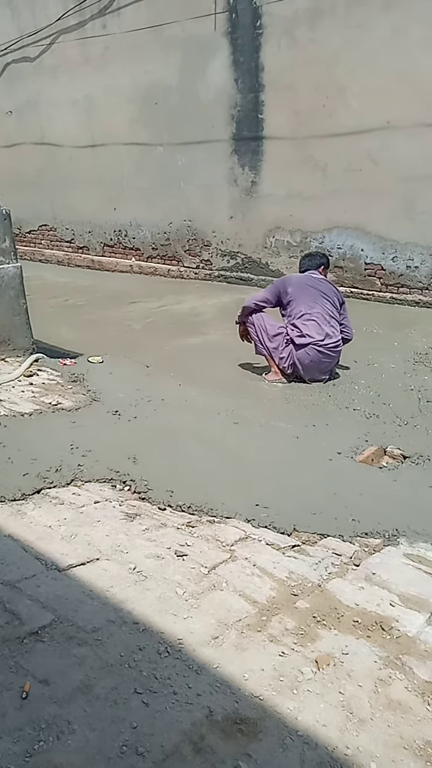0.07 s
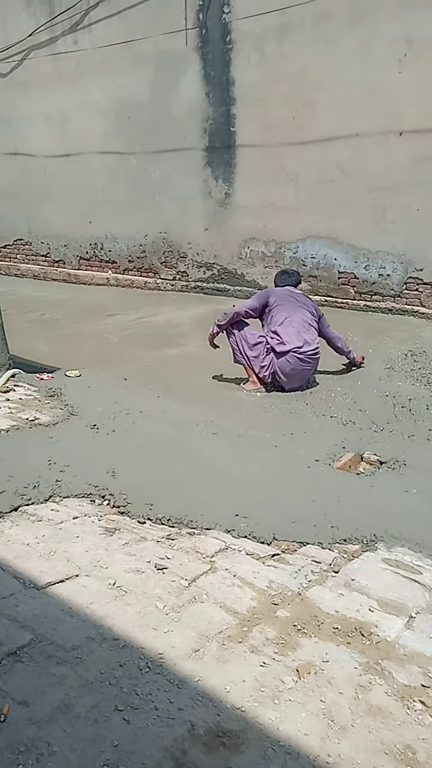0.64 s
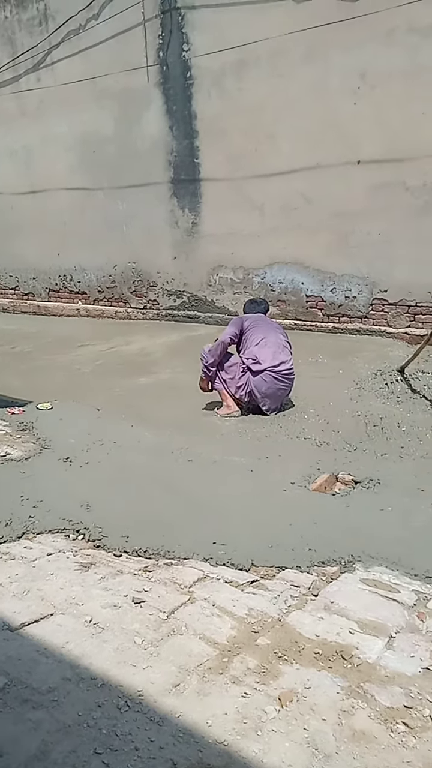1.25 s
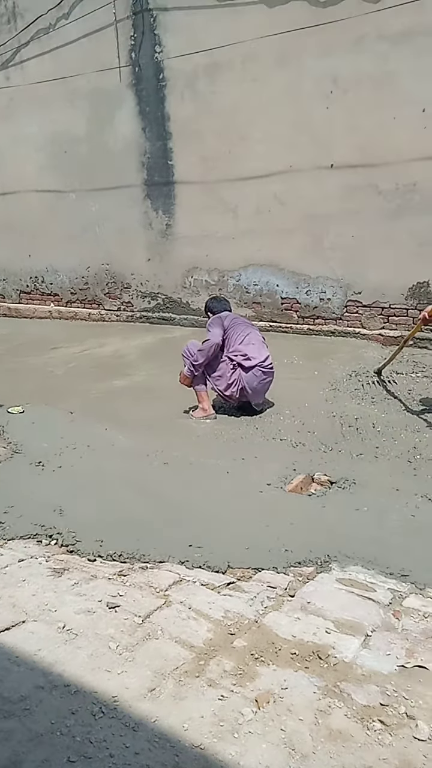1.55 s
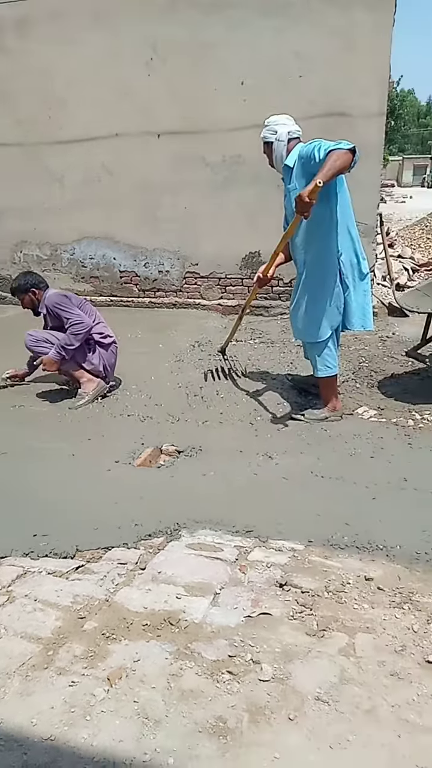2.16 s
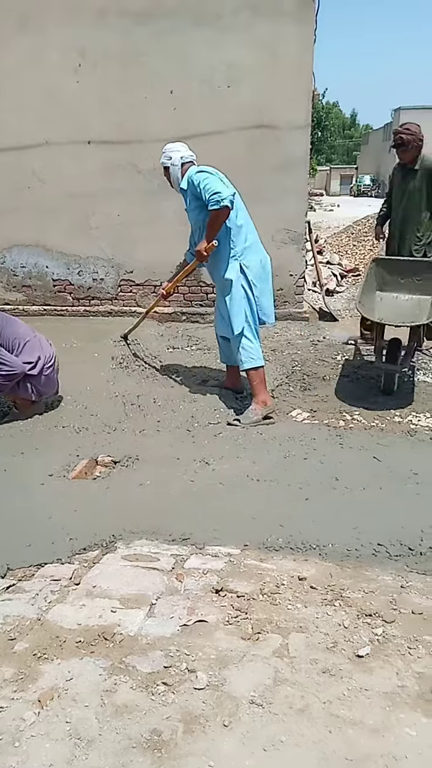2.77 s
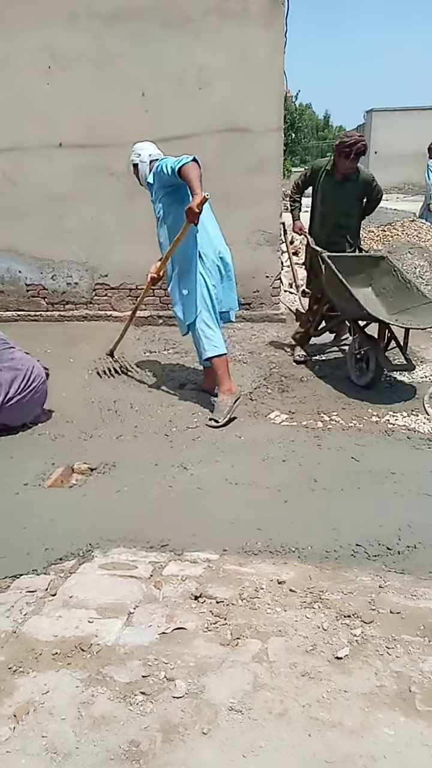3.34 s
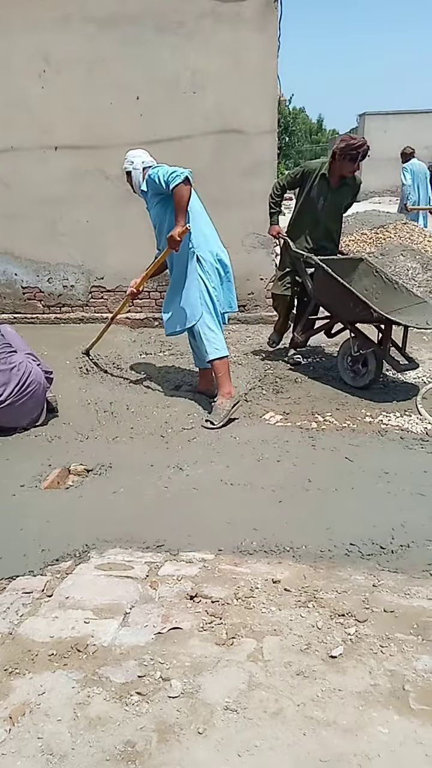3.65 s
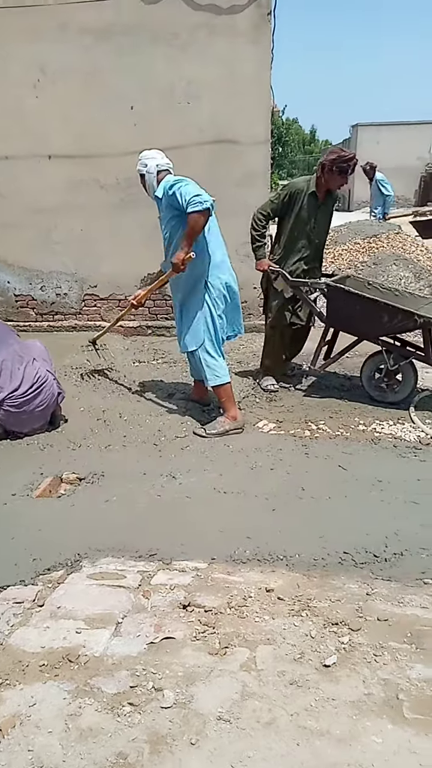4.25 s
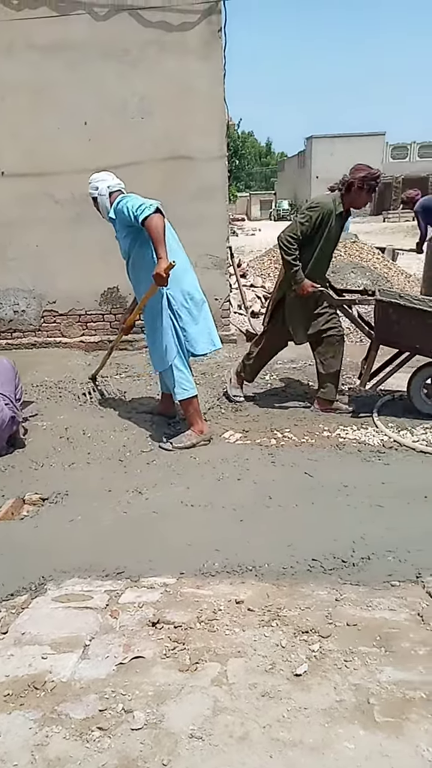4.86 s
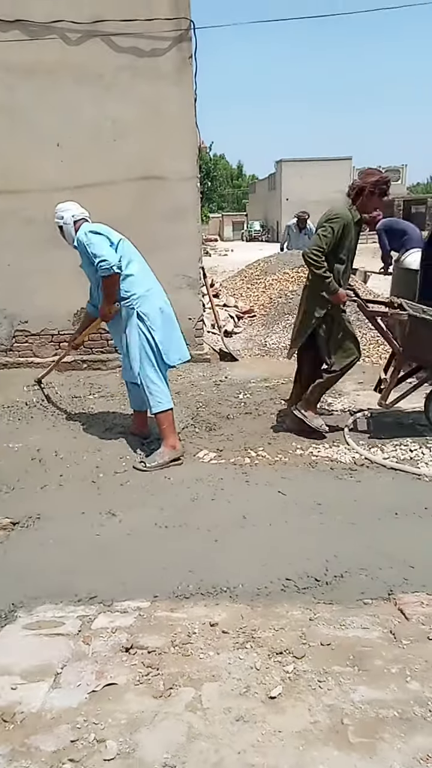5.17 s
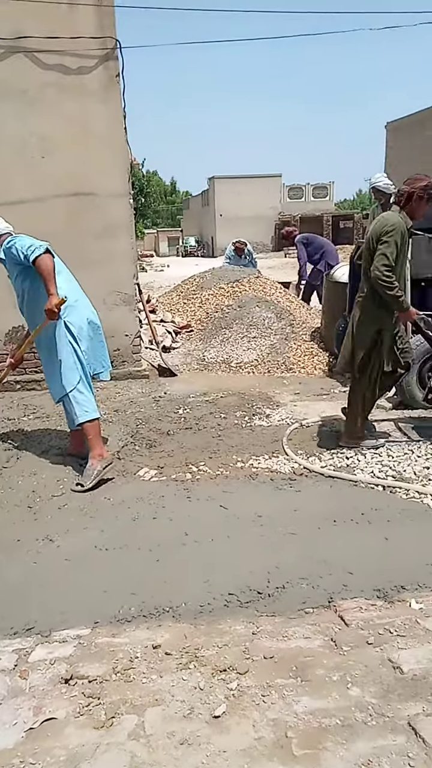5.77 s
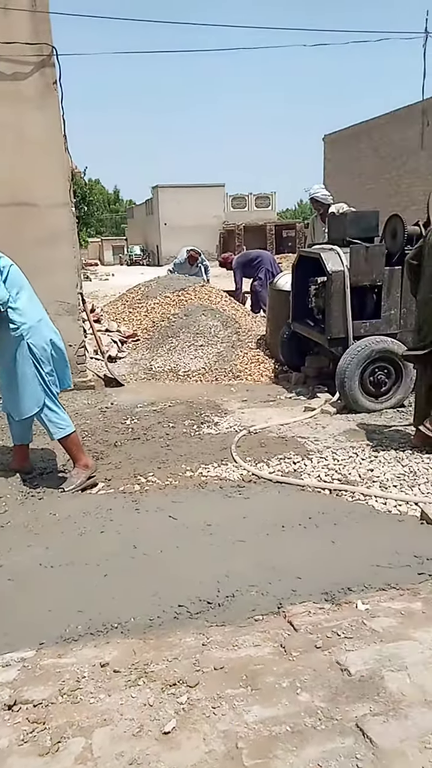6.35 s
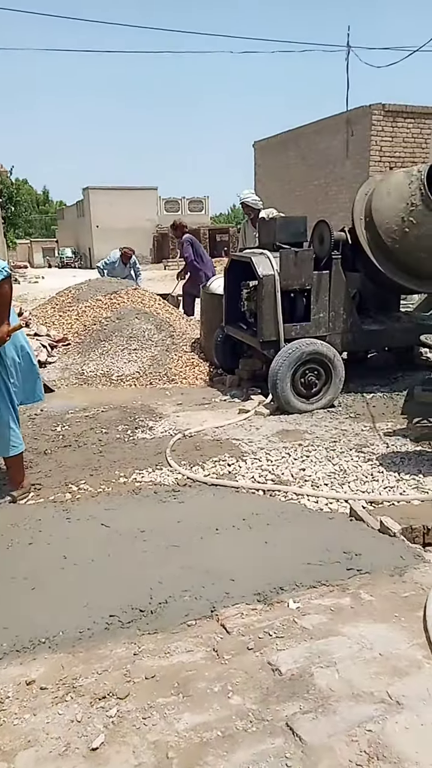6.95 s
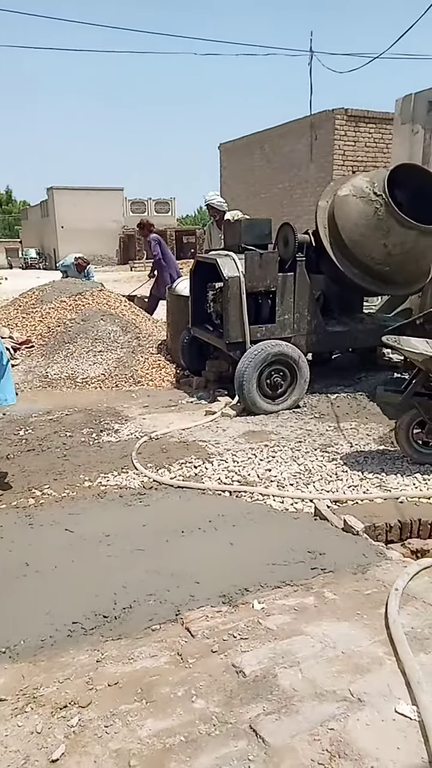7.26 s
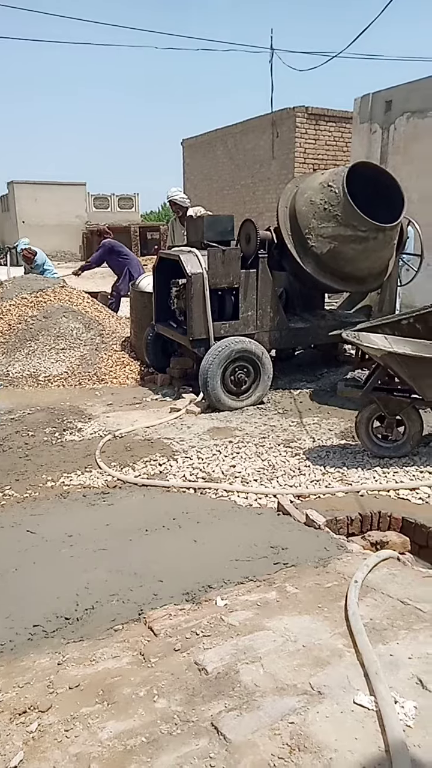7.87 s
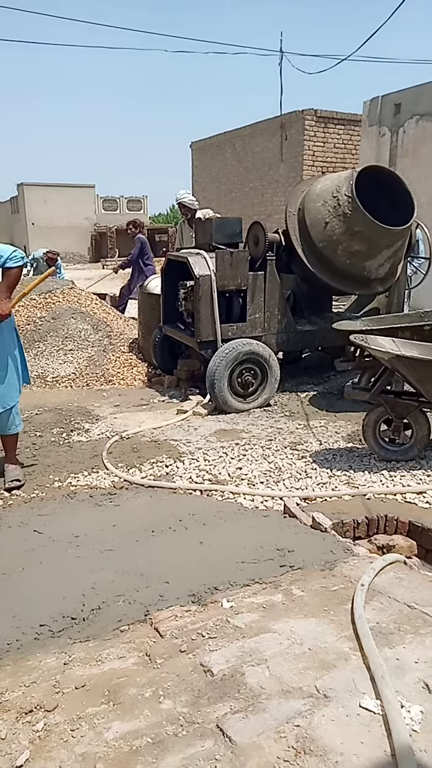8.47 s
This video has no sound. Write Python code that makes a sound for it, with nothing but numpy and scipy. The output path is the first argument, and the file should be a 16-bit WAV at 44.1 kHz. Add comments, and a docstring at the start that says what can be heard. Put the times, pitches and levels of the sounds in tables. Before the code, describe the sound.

A one-cylinder diesel engine drives a concrete mixer in an open yard, chugging steadily at about nine beats a second. Each beat has a low exhaust thump, a metallic knock and valve clatter, while gears grind and faintly whine underneath. Some firings knock harder, and a wall throws the knocks back. The sound dulls slightly early on and grows brighter toward the end, as the mixer faces the microphone more openly.

```python
"""A steady chugging, about 9.4 beats a second: a one-cylinder diesel turns a concrete mixer in a yard.
Its speed and effort wander with the load of the drum, and now and then a firing knocks out hard.
Each cycle brings a gulp of air, a shudder of the engine block, a knock of burning fuel, an exhaust
thump and valve clatter. Gears grind and sing underneath, a wall throws the knocks back,
and a low hum sounds once, briefly."""
import sys
import numpy as np
from scipy import signal
from scipy.fft import rfft, irfft, next_fast_len
from scipy.io import wavfile

SR = 44100
rng = np.random.default_rng(int(sys.argv[2]) if len(sys.argv) > 2 else 0)


def log_audio(samples):
    """Write samples as a 16-bit WAV file to the path given in sys.argv[1]."""
    # one column per channel
    frames = np.atleast_2d(samples).T
    # limit to full scale, then quantise
    limited = np.clip(frames, -1, 1)
    pcm = np.round(limited * 32767).astype(np.int16)
    wavfile.write(sys.argv[1], SR, pcm)


N = 375291
TIME = np.arange(N) / SR
RING_TIME = np.arange(SR // 3) / SR  # seconds since a blow

# How openly the mixer's bright-sounding side faces us. Each row: time in seconds, openness in dB.
OPENNESS = [(0, -4), (1.6, -12), (2.6, -3.5), (4.8, -3), (6.05, -1.5), (6.4, 0.5), (7.5, 3.5), (8.5, 0)]


def chug(gulp_db, thump_db):
    """Air intake, engine block and exhaust ring in turn; swirling gas roughens the thump."""
    # The tones each part rings with. Each row: pitch in Hz, relative level in dB, fade time in seconds.
    intake_tones = [(95.7, -31, 0.26), (287, -32.5, 0.27), (396.4, -9, 0.16)]
    block_tones = [(75.5, -36, 0.27), (125, -29, 0.042), (261.6, -11, 0.13), (351, -10.5, .08)]
    exhaust_tones = [(139.8, -17.5, .22), (165.54, -11, 0.23), (184.8, -14, .2), (220.8, -26.5, 0.34),
                     (341, -9.5, .04), (418, -27, 0.054), (496.6, -17.5, .06), (547.7, -25.5, 0.12)]
    # The gas puff and a steady rumble. Each row: frequency in Hz, relative level in dB.
    puff_spectrum = [(40, -46), (100, -17.5), (130, -2.5), (195, 7.5), (250, -10.5), (320, -6.5),
                     (400, -4.5), (500, -11), (700, -18.5), (5000, -94)]
    rumble_spectrum = [(20, -17.5), (42, -27.5), (62, -10.5), (76, -1), (100, -3), (132, -2.5), (200, 2.5),
                       (320, -2), (420, -2), (500, -9), (700, -27.5), (1500, -44.5), (5000, -92)]
    intake = stroke(intake_tones, .0071, gulp_db, rise=.003, spread_db=1)
    block = stroke(block_tones, .018, .7 * thump_db, rise=.003, spread_db=1.5)
    exhaust = stroke(exhaust_tones, .0338, thump_db, rise=.003, spread_db=1.3)
    puffs = each_cycle(burst(rise=.0014, fade=.34), .02, .88 * thump_db)
    gas = amp(-19.5) * puffs * rattle(puff_spectrum, alike=.3)
    rumble = amp(-23.5) * rattle(rumble_spectrum, alike=.59)
    return intake + block + exhaust + gas + rumble


def knock(hard_db, ping_db):
    """Burning fuel cracks against the cylinder, now soft, now hard; a wall answers each crack."""
    # The knock's crack, and a crisp, bright tick heard with the hardest knocks.
    # Each row: frequency in Hz, relative level in dB.
    knock_spectrum = [(300, -13), (1000, 3.5), (1400, -4.5), (1900, 7), (2350, 9.5), (2600, 0), (2950, 4.5),
                      (3400, -3), (4200, -8), (4700, -24.5), (5500, -39.5), (6600, -34.5), (8300, -52.5),
                      (10800, -42), (13000, -59)]
    tick_spectrum = [(1500, -22), (3000, -9), (3800, -8), (4250, 0), (4550, -9), (4900, -28), (5500, -38),
                     (6600, -35), (8300, -54), (10800, -38), (13000, -60)]
    # Gas ringing in the cylinder. Each row: pitch in Hz, relative level in dB, fade time in seconds.
    ping_tones = [(4160, -50, .09), (4340, -48, .09)]
    crack = each_cycle(soft_burst(rise=.0006, fade=.055), .0286, hard_db)
    echo = each_cycle(soft_burst(rise=.00091, fade=.16), .0415, hard_db)
    tick_gain = each_cycle(soft_burst(rise=.0006, fade=.035), .028, ping_db)
    tick = amp(-44) * tick_gain * rattle(tick_spectrum, alike=.1)
    ping = stroke(ping_tones, .0285, ping_db, rise=.0006, spread_db=1)
    return amp(-24.5) * rattle(knock_spectrum, alike=.13) * np.hypot(crack, .45 * echo) + tick + ping


def firings():
    """Sets each cycle's strength: thump and knock follow the engine's effort, and partly chance."""
    # How hard the engine pulls against the drum. Each row: time in seconds, effort in dB.
    effort = [(0, -4), (.45, 3), (1.22, 1.5), (1.43, -2), (1.9, 1), (2.15, -2), (2.9, 1.5), (3.45, 1.5),
              (3.66, -0.5), (4.19, -2.5), (4.5, 0.7), (5.67, -0.5), (5.85, -5.5), (6.1, -4.5), (6.25, 4),
              (6.95, 0.5), (7.6, 2.5), (8.5, 0)]
    # The air gulp as people pass in front. Each row: time in seconds, relative level in dB.
    gulp_levels = [(0, 5.5), (2, 0), (2.7, 2.4), (4.8, 1.5), (5.5, 0), (6.15, 1.5), (6.85, -1.5), (7.6, 1),
                   (8.5, -0.1)]
    # Firings that knock out hard. Each row: time in seconds, hardness in dB, ping strength in dB.
    hard_knocks = [(.297, -1, 9), (1.146, 0.5, 6.5), (1.252, 2.5, 13.5), (1.987, 1.5, 9), (2.951, 8.5, 12),
                   (3.057, 11, 20.5), (3.481, 10, 10), (3.903, 5.5, -7), (4.008, 6.5, -5), (4.54, 10.5, -3),
                   (5.389, -4, 6), (5.706, 1.5, -2), (6.451, 4.5, 5), (6.666, 5.5, 14), (6.771, 5.5, 13),
                   (7.622, 5.5, 11), (7.728, 6, 13), (7.833, 10.5, 16.5), (8.459, 5.5, 15)]
    starts, effort_db = cycle_starts(), per_cycle(effort)
    air, fuel, timing = rng.standard_normal((len(starts), 3)).T
    gulp_db = per_cycle(gulp_levels) + 1.17 * air
    thump_db = effort_db + .42 * fuel
    hard_db = -1.5 + .8 * thump_db + .69 * per_cycle(OPENNESS) + 3.5 * timing
    ping_db = 1 + 1.5 * hard_db
    for when, hardness, ping in hard_knocks:
        cycle = np.argmin(abs(starts - when))
        hard_db[cycle], ping_db[cycle] = hardness, ping
        thump_db[cycle] = effort_db[cycle] + 1  # a hard firing also thumps more
    return gulp_db, thump_db, hard_db, ping_db


def cycle_starts():
    """Adds up the engine's speed to find when each cycle starts; the first is already under way."""
    # The speed wanders as its regulator hunts. Each row: time in seconds, firings per second.
    speed = [(0, 9.406), (1.2, 9.432), (1.25, 9.515), (2.05, 9.49), (2.7, 9.216), (3.05, 9.393),
             (3.55, 9.475), (5.3, 9.394), (5.85, 9.5), (6.25, 9.301), (6.8, 9.413), (7.4, 9.376),
             (8.1, 9.652), (8.5, 9.457)]
    first_full_s = .0535
    cycles = np.cumsum(np.interp(TIME, *np.transpose(speed))) / SR
    cycles -= np.interp(first_full_s, TIME, cycles)
    return np.r_[first_full_s - 1 / speed[0][1], np.interp(np.arange(cycles[-1]), cycles, TIME)]


def valves():
    """A tappet (a valve's pusher) ticks as the inlet shuts; the rocker levers clatter later on."""
    # The noises of the steel parts. Each row: frequency in Hz, relative level in dB.
    clatter_spectrum = [(300, -11), (900, 10.5), (1500, 5.5), (1850, 1.5), (2600, 6), (2950, 4),
                        (3250, -1.5), (4100, -7.5), (4700, -21.5), (5600, -48), (6600, -40), (8000, -65.5),
                        (11000, -50.5), (14000, -57)]
    sizzle_spectrum = [(800, -17), (1750, 5.5), (2400, -4), (3500, -9), (4300, -10.5), (5400, -32),
                       (6700, -32.5), (8000, -51.5), (11000, -51.5), (14000, -64.5)]
    tappet_spectrum = [(500, -27.5), (1700, -6.5), (2150, 0.5), (2380, 7), (2650, -6), (2900, -7),
                       (3300, -15.5), (4300, -26.5), (5500, -55.5), (9000, -73.5)]
    # Loudness as people pass in front. Each row: time in seconds, relative level in dB.
    clatter_levels = [(0, -28), (1.6, -29.5), (2.4, -26.5), (4.9, -26.5), (5.3, -32), (5.9, -32.5),
                      (6.3, -24), (7, -27), (8.5, -27.5)]
    tappet_levels = [(0, -4), (1.6, -8), (2.8, 1.5), (4.5, 2.5), (5.5, -5), (6.4, -6), (7.4, 1), (8.5, -1)]
    rockers = amp(2.5) * each_cycle(burst(rise=.001, fade=.13), .064, spread_db=1.2, jitter=.0007)
    rebound = amp(1) * each_cycle(burst(rise=.003, fade=.08), .079, spread_db=2, jitter=.003)
    shaking = amp(2.5) * each_cycle(burst(rise=.004, fade=.15), .034, spread_db=2, jitter=.003)
    motion = np.sqrt(amp(-5.5) ** 2 + rockers ** 2 + rebound ** 2 + shaking ** 2)
    ticks = each_cycle(burst(rise=.001, fade=.05), .001, spread_db=1.2, jitter=.0005)
    clatter = curve(clatter_levels) * rattle(clatter_spectrum, alike=.073)
    sizzle = amp(-36) * curve(OPENNESS) * rattle(sizzle_spectrum, alike=.17)
    tappet = amp(-26.5) * curve(tappet_levels) * ticks * rattle(tappet_spectrum, alike=.1)
    return motion * (clatter + sizzle) + tappet


def gears():
    """The drum's gears grind harder after each push of the engine, and one sings unsteadily."""
    # The grinding noise. Each row: frequency in Hz, relative level in dB.
    grind_spectrum = [(100, -26.5), (450, -5.5), (630, 0.5), (900, 4), (1050, 1.5), (1300, 0.5), (1500, -5),
                      (2200, -10), (3000, -23), (3400, -16), (4200, -28), (5400, -58.5), (6600, -63.5),
                      (8500, -84)]
    # Loudness as people pass in front. Each row: time in seconds, relative level in dB.
    grind_levels = [(0, -29), (1.1, -30), (2, -28.5), (4.4, -30), (4.9, -26.5), (5.3, -28.5), (7, -29),
                    (7.8, -26), (8.5, -28)]
    whine_levels = [(0, -5), (.8, 0.5), (1.6, -5), (3, -9), (4.1, 3.5), (4.8, -10), (6.4, 1.5), (8.5, 3.5)]
    load = each_cycle(burst(rise=.0096, fade=.21), .013, spread_db=3.5)
    grind = curve(grind_levels) * (amp(-3) + amp(1.5) * load) * rattle(grind_spectrum, alike=.21)
    return grind + amp(-37.5) * curve(whine_levels) * whine(hz=1245, width_hz=25)


def whine(hz, width_hz):
    """Gear teeth touching at random keep one narrow tone ringing."""
    pole = np.exp((-np.pi * width_hz + 2j * np.pi * hz) / SR)
    return unit(signal.lfilter([1], np.poly([pole, pole]), rng.standard_normal(N)).real)


def hum(start_s=4.765, length_s=.135, hz=188, level_db=-19):
    """A brief low hum: one pure tone that fades in and out."""
    t, out = np.arange(int(length_s * SR)) / SR, np.zeros(N)
    tone = amp(level_db) * np.sqrt(2) * np.sin(2 * np.pi * hz * t)
    add(out, start_s, signal.windows.tukey(len(t), .5) * tone)
    return out


def stroke(tones, delay, level_db, rise, spread_db):
    """One blow in every cycle sets a part's tones ringing, a little differently each time."""
    out = np.zeros(N)
    for hz, db, fade in tones:
        tone = amp(db) * burst(rise, fade) * np.sin(2 * np.pi * hz * RING_TIME)
        out += each_cycle(tone, delay, level_db, spread_db, jitter=.00017)
    return out


def rattle(spectrum, alike):
    """Dense metal noise; the share `alike` repeats, since the same parts meet in every cycle."""
    repeated = unit(each_cycle(rng.standard_normal(SR // 9), 0))
    fresh = rng.standard_normal(N)
    return colour(np.sqrt(alike) * repeated + np.sqrt(1 - alike) * fresh, spectrum)


def colour(noise, spectrum):
    """Gives noise its balance of low and high frequencies, with the ring of steel on top."""
    # Steel parts that ring. Each row: pitch in Hz, width in Hz, boost in dB.
    steel_rings = [(900, 50, 1), (1013, 39, 2), (1320, 15, 0), (1607, 60, 3), (1863, 41, 5.5),
                   (2230, 150, 2), (2933, 190, 5.5), (3960, 150, 3)]
    size = next_fast_len(N)
    hz = np.fft.rfftfreq(size, 1 / SR)
    row_hz, row_db = np.transpose(spectrum)
    spectrum_db = np.interp(np.log(hz + 1), np.log(row_hz + 1), row_db)
    steel_db = sum(db / (1 + (2 * (hz - pitch) / width) ** 2) for pitch, width, db in steel_rings)
    return unit(irfft(rfft(noise, size) * amp(spectrum_db + steel_db), size)[:N])


def each_cycle(shape, delay, level_db=0, spread_db=0, jitter=0):
    """Repeats a shape `delay` seconds into each cycle; spread_db varies its level, jitter its timing."""
    starts = cycle_starts()
    size, slip = rng.standard_normal((len(starts), 2)).T
    out = np.zeros(N)
    for start_s, gain in zip(starts + delay + jitter * slip, amp(level_db + spread_db * size)):
        add(out, start_s, gain * shape)
    return out


def burst(rise, fade):
    """The loudness of a blow: it swells in about `rise` seconds and falls 60 dB in `fade` seconds."""
    smooth_end = np.minimum(1, (RING_TIME[-1] - RING_TIME) / .026)
    return (1 - np.exp(-RING_TIME / rise)) * amp(-60 * RING_TIME / fade) * smooth_end


def soft_burst(rise, fade):
    """The loudness of a blow with a rounded start."""
    return burst(rise, fade) * (1 - np.exp(-RING_TIME / rise))


def curve(points):
    """Turns a few levels in dB into a gain for every sample."""
    return amp(np.interp(TIME, *np.transpose(points)))


def per_cycle(points):
    """Reads a curve at the start of every cycle."""
    return np.interp(cycle_starts(), *np.transpose(points))


def add(mix, start_s, sound):
    """Mixes a sound in, cutting off whatever falls outside the mix."""
    start = round(start_s * SR)
    sound = sound[max(-start, 0):]
    part = mix[max(start, 0):][:len(sound)]
    part += sound[:len(part)]


def amp(db):
    """Turns decibels into a gain to multiply by."""
    return 10 ** (np.asarray(db) / 20)


def unit(x):
    """Scales a sound to an average power of 1."""
    return x / np.sqrt(np.mean(x ** 2) + 1e-20)


def scene():
    """The mixer in its yard, on one channel."""
    gulp_db, thump_db, hard_db, ping_db = firings()
    return (chug(gulp_db, thump_db) + knock(hard_db, ping_db) + valves() + gears() + hum())[None]


def record(dry):
    """The microphone drops the deepest bass and adds faint hiss; the highest treble is cut off."""
    heard = signal.sosfilt(signal.butter(3, 50, "highpass", fs=SR, output="sos"), dry)
    hiss = amp(-98) * rng.standard_normal(dry.shape)
    treble_cut = signal.firwin(511, 15500, window=("kaiser", 9), fs=SR)
    return signal.oaconvolve(heard + hiss, treble_cut[None], "same")


dry = scene()
out = record(dry)
log_audio(out)
```